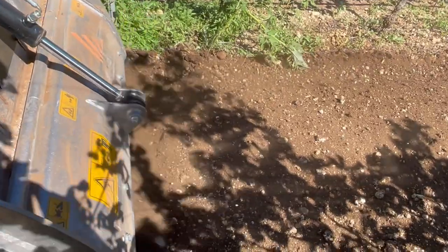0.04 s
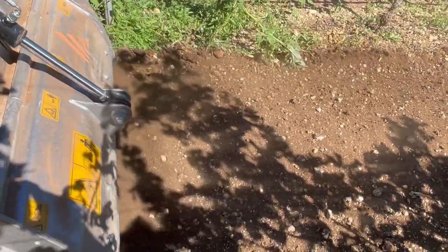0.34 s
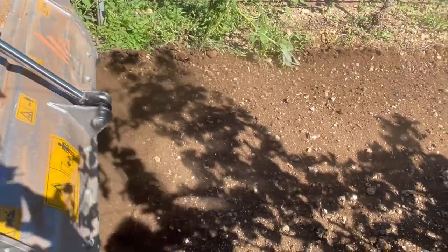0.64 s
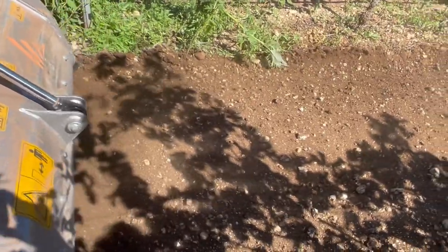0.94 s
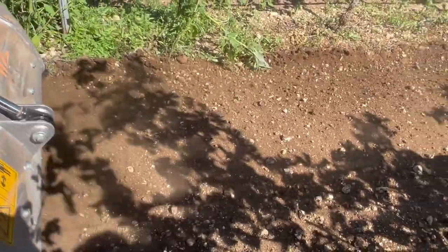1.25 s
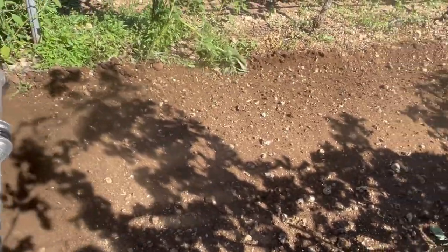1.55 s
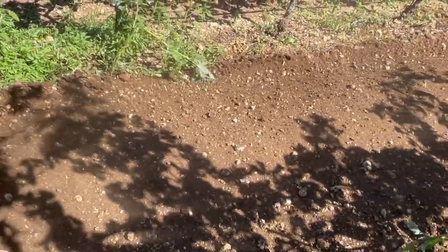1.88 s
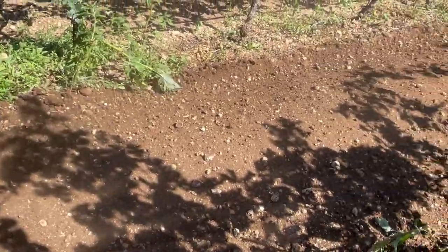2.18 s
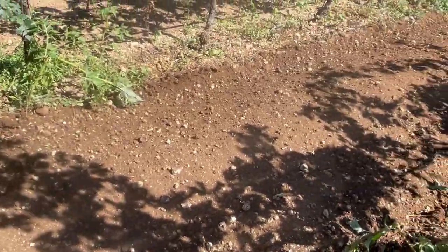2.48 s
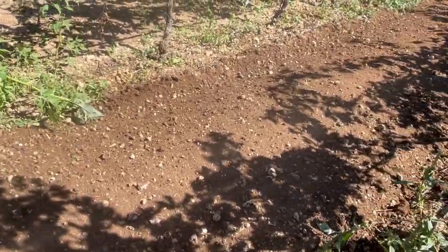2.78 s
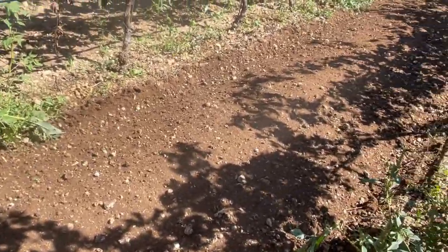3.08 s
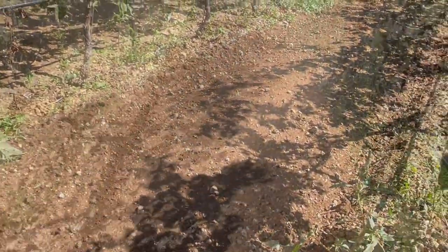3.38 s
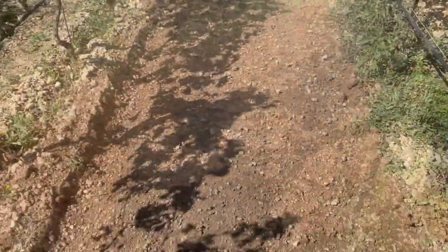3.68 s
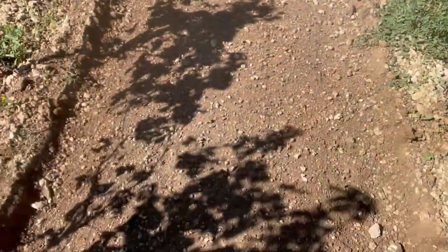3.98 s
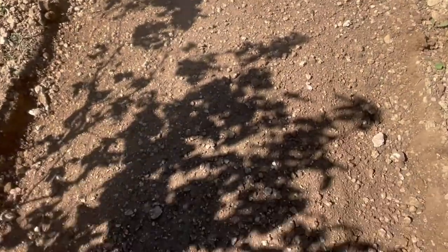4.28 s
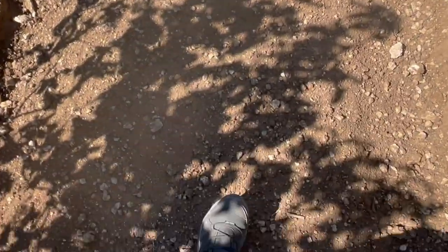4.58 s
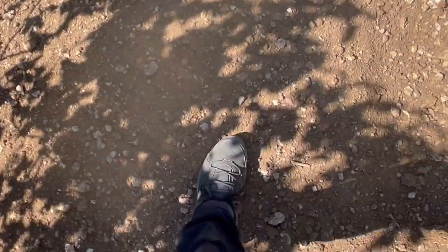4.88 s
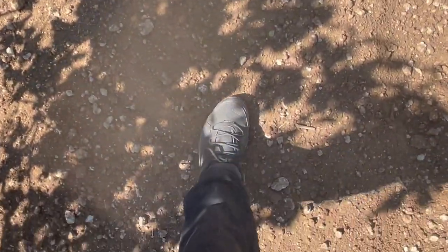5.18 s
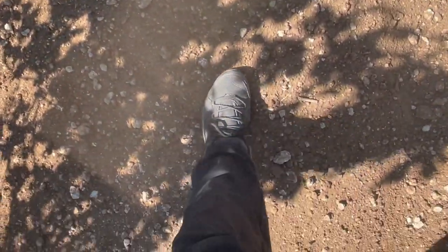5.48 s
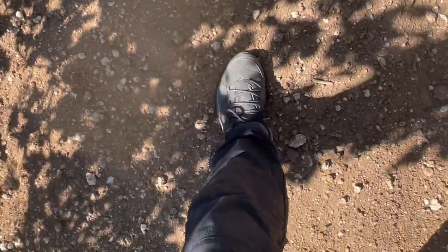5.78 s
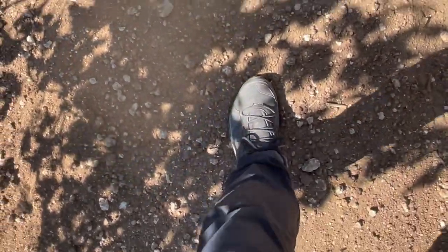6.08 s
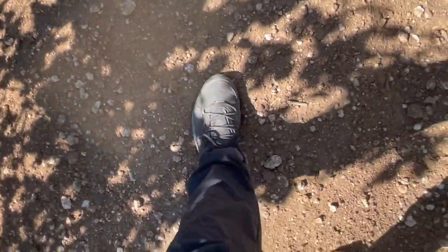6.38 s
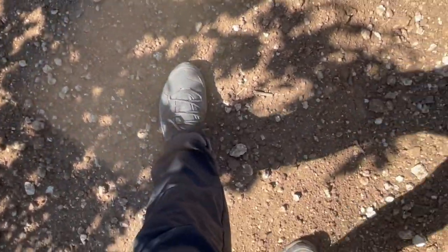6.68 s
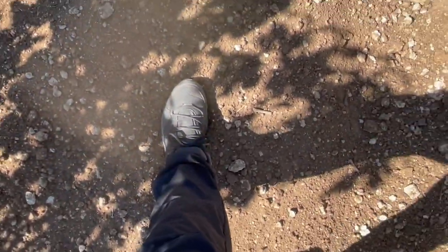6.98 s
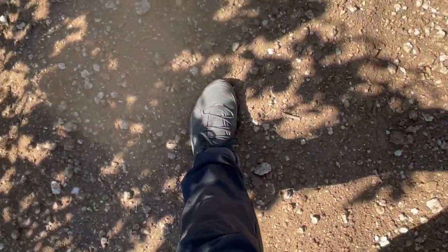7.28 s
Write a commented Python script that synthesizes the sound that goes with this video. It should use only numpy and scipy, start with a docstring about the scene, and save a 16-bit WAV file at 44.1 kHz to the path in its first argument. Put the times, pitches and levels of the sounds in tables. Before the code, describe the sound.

Outdoors on a dirt track, a nearby stone crusher grinds without pause behind a droning diesel tractor. Rocks tumble in the drum, rattle against the metal hood and spray out as grit, with brief swells and scattered hard cracks. The machine is first heard from the side, leaning left, then midway from the front, where the noise has a hollow, slowly shifting colour and the knocks eventually thin out.

```python
"""Stone crusher on a dirt track

A tractor tows a crusher: diesel and rotor hum, the drum rumbles, stones shatter on the steel hood and grit
sprays out, swelling with heaps and dipping in a gap in the feed. Impacts excite exponentially decaying
modes. The machine passes close on the left; from 3.5 s it is heard from the front, and interference with
the ground echo gives a hollow colour that shifts as the microphone sinks."""
import sys
import numpy as np
from scipy import signal
from scipy.fft import rfft, irfft, next_fast_len
from scipy.io import wavfile

SR = 44100
rng = np.random.default_rng(int(sys.argv[2]) if len(sys.argv) > 2 else 0)


def store_wav(level_fs):
    """Save 16-bit WAV to argv[1]."""
    pcm = np.round(np.clip(np.atleast_2d(level_fs), -1, 1) * 32767)
    wavfile.write(sys.argv[1], SR, pcm.T.astype(np.int16))


N = 328545
T = np.arange(N) / SR
FFT_SIZE = next_fast_len(N + 4096)
HZ = np.maximum(np.arange(FFT_SIZE // 2 + 1) * SR / FFT_SIZE, 1)
FIRING_HZ, ROTOR_HZ = 61.53, 26.1

# Crushing at even feed. Each row: time in seconds, then hood clatter, stone rattle and grit spray in dB.
CRUSH_LEVELS = [(0, -26.5, -30.5, -37.5), (.8, -25, -31.5, -37.5), (1.2, -25.5, -31, -37),
                (1.7, -25, -29.5, -35), (2.55, -28, -30, -39.5), (3.7, -24.5, -28, -35),
                (4.7, -27, -31.5, -40), (6.5, -25.5, -31.5, -40.5), (6.95, -26.5, -30.5, -38),
                (7.45, -26.5, -31, -34)]


def from_db(db):
    """Amplitude grows tenfold every 20 dB."""
    return 10 ** (np.asarray(db) / 20)


def unit_power(x):
    """Division by the RMS value gives unit power."""
    return x / np.sqrt(np.mean(x ** 2) + 1e-20)


def in_time(rows):
    """Linear interpolation of each column over time."""
    times, *columns = np.transpose(rows)
    return [np.interp(T, times, column) for column in columns]


def in_hz(points):
    """Interpolation over log frequency."""
    hz, value = np.transpose(points)
    return np.interp(np.log(HZ), np.log(hz), value)


def filtered(x, response):
    """A linear filter multiplies the spectrum by its response."""
    return irfft(rfft(x, FFT_SIZE) * response, FFT_SIZE)[..., :N]


def coloured(x, spectrum):
    """Spectral shaping, scaled to unit power."""
    return unit_power(filtered(x, from_db(in_hz(spectrum))))


def drift(rate_hz):
    """Low-passed noise: a smooth random fluctuation of unit power."""
    pole = np.exp(-80 * np.pi * rate_hz / SR)
    slow = signal.lfilter([1], [1, -2 * pole, pole * pole], rng.standard_normal(N // 40 + 2002))[2000:]
    return np.interp(np.arange(N) / 40, np.arange(len(slow)), unit_power(slow))


def decay(start_s, db, t60):
    """Exponential damping: a sudden start, then a fall of 60 dB in t60 seconds."""
    out, start = np.zeros(N), int(start_s * SR)
    age = T[:min(N - start, SR // 4)]
    out[start:start + len(age)] = from_db(db - 60 * age / t60)
    return out


def ring(clicks, hz, t60):
    """A damped resonator answers a unit impulse with a decaying sine of height 1."""
    r, w = from_db(-60 / (t60 * SR)), 2 * np.pi * hz / SR
    return signal.lfilter([0, np.sin(w)], [1, -2 * r * np.cos(w), r * r], clicks + 1e-18)


def tone(turns, unsteady):
    """Random modulation sways the level and phase of a sinusoid of unit power."""
    angle = 2 * np.pi * (turns + rng.random())
    in_phase = (1 + unsteady * drift(7.5)) * np.cos(angle)
    quadrature = unsteady * drift(6.9) * np.sin(angle)
    return (in_phase + quadrature) / np.sqrt(.5 + unsteady ** 2)


def strays(per_s, range_db=6):
    """Events at random gaps. Each row: start in seconds, dB below the strongest, pitch from -1 to 1."""
    gaps, weakness, pitch = rng.random((64, 3)).T
    starts = np.cumsum(.5 + gaps) / per_s
    return np.column_stack([starts, range_db * weakness, 2 * pitch - 1])[starts < T[-1]]


def impacts(per_s, spread_db, t60, rotor_db, surge_db, stones, stay_s=.12):
    """Shot noise on two paths: random blows, modulated at the rotor rate, ring a few passing stones."""
    modulation = from_db(rotor_db * np.cos(2 * np.pi * ROTOR_HZ * T + drift(15)) + surge_db * drift(24))
    sizes = modulation * from_db(spread_db * np.minimum(rng.exponential(1, N), 4))
    sizes *= rng.choice([-1, 1], N)
    rings = rng.standard_normal((512, 2, 2048)) * decay(0, 0, t60)[:2048]  # each stone's dense modes
    struck = (stones * (T / stay_s + rng.random(N))).astype(int) % len(rings)
    out = np.zeros((2, N + SR))
    for i in np.flatnonzero(rng.random(N) < per_s / SR):
        out[:, i:i + rings.shape[-1]] += sizes[i] * rings[struck[i]]
    return out[:, :N]


def load(onset_s=0.029, recovery_s=0.055):
    """Amplitude modulation by the load, in dB: the crushing swells with a heap and dips in a gap."""
    # Heaps and gaps in the feed. Each row: start in seconds, length in seconds, change of load in dB.
    feed = [(0.0, 0.063, 3), (0.915, 0.095, 5), (1.143, 0.027, -5), (1.25, 0.092, 1.5), (1.898, 0.11, 3),
            (2.166, 0.12, 2), (2.885, 0.11, 2), (3.24, 0.055, 0), (3.364, 0.063, 2), (3.887, 0.11, 2),
            (4.2, 0.11, 0), (5.193, 0.098, 2.5), (6.14, 0.26, 1.5), (6.778, 0.31, 1.5), (7.268, 0.04, 1)]
    return sum(db * np.interp(T, [s - onset_s, s, s + length, s + length + recovery_s], [0, 1, 1, 0])
               for s, length, db in feed)


def drive(load_db, wander=0.0012, whine_db=-12, teeth_rows=4):
    """Periodic forcing: diesel firing, gear whine and rotor teeth all follow one governed speed."""
    # Each row: multiple of the firing rate, dB from the side, dB from the front, unsteadiness from 0 to 1.
    partials = [(0.994, -31.5, -26, 0.077), (1.982, -33.5, -28, 0.24), (2.136, -40, -35.5, 0.3),
                (5.59, -64, -42, 0.25), (6.45, -44, -43, 0.3), (13.94, -43.5, -45.5, .39),
                (18.3, -47, -44, 0.44), (20.1, -39.5, -41, 0.21)]
    # The drone, and the teeth biting the soil. Each row: time in seconds, base level in dB.
    drone_levels = [(0, -30), (1.35, -32.5), (1.75, -33.5), (2.2, -32), (3.45, -41.5), (3.7, -26.5),
                    (4.7, -28), (5.7, -27), (7.45, -26)]
    bite_levels = [(0, -28), (1.1, -35), (1.6, -34), (2.05, -26), (2.6, -34.5), (3.2, -25.5), (3.7, -34.5),
                   (7.45, -32.5)]
    clock = np.cumsum(1 + wander * drift(1.57)) / SR
    beside = sum(viewpoints()[:2])
    engine = np.zeros(N)
    for multiple, side_db, front_db, unsteady in partials:
        level_db = beside * side_db + (1 - beside) * front_db
        engine += from_db(level_db) * tone(multiple * FIRING_HZ * clock, unsteady)
    drone_turns = 4 * FIRING_HZ * clock
    drone = tone(drone_turns, unsteady=.06) + from_db(whine_db) * tone(3 * drone_turns, unsteady=.15)
    teeth = tone(teeth_rows * ROTOR_HZ * clock, unsteady=0.43)
    bite_db = in_time(bite_levels)[0] + .8 * load_db
    return engine + drone * from_db(in_time(drone_levels)[0]) + teeth * from_db(bite_db)


def drum(load_db, rumble_db=-24.5, off_pitch_db_per_octave=12.5):
    """Resonance: soil and stones tumble, and heavy lumps excite most the drum modes near their pitch."""
    # The rumble. Each row: frequency in Hz, relative level in dB.
    spectrum = [(20, -46), (42, -30), (62, -11.5), (85, 0), (105, -1), (150, -9.5), (190, -4.5), (290, -7),
                (340, -15), (450, -29), (900, -48.5)]
    # Heavy lumps. Each row: start in seconds, level in dB, pitch in Hz.
    lumps = [(0.471, -14, 137), (0.929, -18, 207), (.946, -19, 200), (0.976, -13, 190), (0.991, -10, 105),
             (1.311, -10, 170), (1.406, -14.5, 186), (2.182, -23, 100), (2.283, -22, 170),
             (2.929, -12.5, 170), (3.004, -16, 191), (3.366, -15, 96), (3.439, -16, 195), (3.969, -13, 96),
             (5.17, -21, 190), (5.309, -14, 110), (6.349, -19, 320)]
    # Drum modes. Each row: frequency in Hz, gain in dB, t60 in seconds.
    modes = [(97, 2.5, 0.091), (121, -10, 0.073), (167, 0.5, 0.078), (193, -7, 0.11), (333, 4.5, 0.061)]
    tumble = impacts(per_s=900, spread_db=2.0, t60=0.047, rotor_db=1.0, surge_db=0.34, stones=16)
    rumble = coloured(tumble, spectrum) * from_db(rumble_db + load_db)
    starts, lump_db, lump_hz = np.transpose(lumps)
    for hz, mode_db, t60 in modes:
        mismatch_db = off_pitch_db_per_octave * abs(np.log2(hz / lump_hz))
        blows = np.zeros(N)
        blows[(starts * SR).astype(int)] = from_db(lump_db + mode_db - mismatch_db)
        rumble[0] += ring(blows, hz, t60)
    return rumble


def crushing(load_db):
    """Dense impacts merge into noise: stones hit the hood, crack on each other and spray out as grit."""
    # Spectra of the three layers. Each row: frequency in Hz, relative level in dB.
    hood_spectrum = [(200, -5.5), (300, -7), (385, 1.5), (470, -4.5), (660, 0), (780, -2), (900, -4),
                     (1250, -1.5), (1650, -3.5), (2100, -20), (4000, -34.5)]
    rattle_spectrum = [(900, -49), (1500, -1.5), (1850, 3), (2100, 2.5), (2400, 2), (2750, 0), (3200, -2),
                       (3700, -4.5), (4300, -5.5), (5100, -9.5), (6000, -14.5), (9000, -40)]
    grit_spectrum = [(3000, -23), (5000, 6.5), (5800, 2), (7300, 1), (9500, -1), (11500, -8.5),
                     (13600, -23), (16000, -2)]
    hood_db, rattle_db, grit_db = in_time(CRUSH_LEVELS)
    hood = impacts(per_s=2000, spread_db=1.0, t60=0.046, rotor_db=-0.2, surge_db=0.6, stones=10)
    rattle = impacts(per_s=2200, spread_db=1.5, t60=0.042, rotor_db=1.07, surge_db=0.77, stones=8)
    grit = impacts(per_s=1300, spread_db=2.0, t60=0.021, rotor_db=1.0, surge_db=1.5, stones=6)
    return (coloured(hood, hood_spectrum) * from_db(hood_db + 0.43 * load_db)
            + coloured(rattle, rattle_spectrum) * from_db(rattle_db + 0.34 * load_db)
            + coloured(grit, grit_spectrum) * from_db(grit_db + 0.12 * load_db))


def chips(over_grit_db=7, pure_t60=0.032, snap_t60=0.0015, snap_low_hz=3000):
    """Free vibration: a pebble snaps and rings at a pitch set by its size, purer the longer it lasts."""
    # Each row: start in seconds, level in dB, pitch in Hz, t60 in seconds, snap in dB relative to the ring.
    pebbles = [(.029, -15.5, 5400, .0087, -9), (.055, -19, 4500, .01, -9), (.37, -14.5, 4400, 0.01, -9),
               (.447, -16, 3300, 0.018, -6), (.461, -20, 12000, .0097, -2), (.519, -28, 9000, .009, -3),
               (.627, -22.5, 6000, .012, -7), (.826, -20, 6200, .007, -5), (1.122, -19, 6000, .0068, -4),
               (1.531, -11.5, 5600, .0084, -11), (1.659, -28, 13000, .0089, -4),
               (1.772, -26, 8500, .008, -5), (1.871, -29, 10000, .008, -5), (1.89, -19, 7600, .008, -5),
               (2.062, -26, 6000, .008, -1), (2.12, -19.5, 8950, 0.0071, -2), (2.23, -21, 5000, 0.012, -7),
               (2.489, -21, 4200, 0.012, -8), (2.949, -30, 12000, 0.0072, -3),
               (2.991, -21, 3800, 0.018, -12), (3.12, -24, 5800, .009, -10), (3.474, -22, 6540, .01, 1),
               (3.927, -22, 7960, 0.015, -11), (4.301, -25, 8000, .009, -5), (4.421, -27, 7000, .009, -10),
               (6.197, -25, 5200, .013, -9), (6.411, -28, 5300, .013, -12), (6.763, -23, 4400, 0.015, -9),
               (6.838, -13, 3690, 0.029, -9), (7.11, -19, 6700, .0083, -5)]
    crack = rng.standard_normal((2, N))
    high_pass = signal.butter(2, snap_low_hz, "high", fs=SR, output="sos")
    snap = signal.sosfilt(high_pass, rng.choice([-1., 1.], (2, N)))
    grit_db = in_time(CRUSH_LEVELS)[2]
    lesser = [(s, grit_db[int(s * SR)] + over_grit_db - weaker, 7500 * 2 ** (0.7 * pitch), 0.008, -10)
              for s, weaker, pitch in strays(per_s=5)]
    out = np.zeros((2, N))
    for s, db, hz, t60, snap_db in pebbles + lesser:
        span = slice(int(s * SR), int(s * SR) + SR // 10)
        purity = np.clip(2 * t60 / pure_t60 - 1, 0, 1)
        rough = unit_power(signal.lfilter(*signal.iirpeak(hz, Q=2.8, fs=SR), crack[:, span]))
        note = np.sin(2 * np.pi * hz * (T[span] - s))
        body = np.sqrt(1 - purity) * rough + np.sqrt(2 * purity) * note
        out[:, span] += body * decay(s, db, t60)[span]
        out[:, span] += snap[:, span] * decay(s, db + snap_db, snap_t60)[span]
    return out


def knocks(panel_gain=1.4, burst_s=0.00052):
    """Broadband excitation: a big stone bursts on the soil-damped hood, and the struck panel resonates."""
    # Each row: start in seconds, level in dB, t60 in seconds, pitch of the panel in Hz.
    big_stones = [(0.331, -20, 0.074, 2320), (0.927, -20, .16, 1300), (.962, -25, .2, 700),
                  (1.244, -19, 0.087, 750), (1.311, -21, 0.099, 1200), (1.81, -19, 0.025, 1200),
                  (1.954, -21, 0.12, 2300), (2.427, -18.5, 0.064, 2480), (2.586, -23.5, 0.11, 2260),
                  (2.893, -20, 0.045, 750), (3.083, -20, 0.076, 724), (3.366, -9.5, 0.11, 1210),
                  (3.432, -20, 0.16, 2350), (3.525, -23, 0.15, 2780), (3.862, -19, 0.089, 1170),
                  (3.898, -16.5, 0.15, 1180), (3.925, -15, 0.12, 1130), (4.041, -21, 0.063, 2660),
                  (4.281, -27, 0.1, 1220), (5.831, -26.5, 0.17, 5100), (6.139, -23, 0.15, 2600),
                  (7.005, -20, 0.12, 2070), (7.332, -17.5, 0.046, 2530)]
    # The crash. Each row: frequency in Hz, relative level in dB.
    spectrum = [(150, -10), (400, -3), (1100, 10), (2200, 6.5), (3500, -0.5), (5500, -1.5), (8000, -26),
                (15000, -50)]
    crash = coloured(rng.standard_normal((2, N)), spectrum)
    lesser = [(s, -32 - weaker, 0.051, 2000 * 2 ** (pitch / 2)) for s, weaker, pitch in strays(per_s=1.3)]
    out = np.zeros((2, N))
    for s, db, t60, hz in big_stones + lesser:
        span = slice(int(s * SR), int(s * SR) + SR // 4)
        panel = signal.lfilter(*signal.iirpeak(hz, Q=4.9, fs=SR), crash[:, span])
        envelope = decay(s, db, t60)[span] * np.clip((T[span] - s) / burst_s, 0, 1)
        out[:, span] += unit_power(crash[:, span] + panel_gain * panel) * envelope
    return out


def delayed(paths, ms):
    """Propagation delay, steady or moving."""
    return np.array([np.interp(T - ms / 1000, T, path) for path in paths])


def over_ground(x, dull_hz=4300, near_from_s=6.48, near_to_s=7.12, near_fade_s=0.17):
    """Comb filtering: dull echoes off the track and, briefly, a nearby surface interfere with the sound."""
    # The echo follows microphone height. Each row: time in seconds, lag in ms, strength from 0 to 1.
    reflection = [(0, 1.54, 0.09), (1.3, 1.38, 0.07), (2.4, 1.33, 0.04), (3.46, 1.18, 0.17),
                  (3.54, 1.83, 0.28), (4.15, 1.93, 0.23), (4.3, 1.73, 0.3), (4.52, 1.39, 0.16),
                  (5, 1.3, .17), (5.3, 1.3, 0.42), (5.6, 1.26, 0.34), (5.97, 1.09, 0.33), (6.3, 1.31, 0.53),
                  (6.6, 1.11, 0.24), (6.85, 0.93, 0.3), (7.1, 1.11, 0.16), (7.45, 1.18, 0.26)]
    lag_ms, strength = in_time(reflection)
    near = 0.2 * np.clip(np.minimum(T - near_from_s, near_to_s - T) / near_fade_s, 0, 1)
    dull = filtered(x, 1 / (1 + (HZ / dull_hz) ** 4))
    return (x + strength * delayed(dull, lag_ms) + near * delayed(dull, ms=1.44)) / np.sqrt(1 + strength ** 2)


def at_ports(spectra, colour, coherence, balance, lead):
    """Stereo cues: direct and scattered sound reach two microphone ports, unequal in level and phase."""
    direct, scattered = spectra * from_db(in_hz(colour))
    alike, sign = np.clip(in_hz(coherence), 0, 1), np.array([[1], [-1]])
    ports = np.sqrt((1 + alike) / 2) * direct + sign * np.sqrt((1 - alike) / 2) * scattered
    gain = from_db(sign * in_hz(balance) / 2)
    gain /= np.sqrt(np.mean(gain ** 2, axis=0))
    return irfft(ports * gain * np.exp(.5j * sign * in_hz(lead)), FFT_SIZE)[:, :N]


def viewpoints(passed_s=1.516, turned_s=3.52, lowered_s=4.66):
    """Crossfade weights for close, side, front and low: the hood passes, the microphone turns and sinks."""
    passed = np.clip((T - passed_s) / 0.24 + .5, 0, 1)
    turned = np.clip((T - turned_s) / 0.0023 + .5, 0, 1)
    lowered = np.clip((T - lowered_s) / 0.68 + .5, 0, 1)
    return 1 - passed, passed * (1 - turned), turned * (1 - lowered), turned * lowered


def at_listener(paths):
    """Each listening position has its own transfer function to the left and right ports."""
    # Colour. Each row: frequency in Hz, gain in dB.
    close_colour = [(60, 0.5), (120, 0), (200, 1.5), (320, 0.5), (400, 5), (680, 2.5), (1000, 0),
                    (1300, -1.5), (1500, -2.5), (2050, 1.5), (2350, -2), (3000, 0), (3700, -1.5),
                    (5000, -3), (12000, -0.5)]
    side_colour = [(60, 1.5), (150, 0), (200, 1), (320, -2), (400, 3), (680, 3), (1000, 0.5), (1300, -1),
                   (1500, -1.5), (2100, 1), (2450, -0.5), (3100, -2.5), (5000, -2.5), (12000, 0)]
    front_colour = [(60, .5), (240, 0), (330, -5), (420, -7.5), (560, 1.5), (720, 0), (850, -4.5),
                    (1150, -0.5), (1500, -4.5), (1700, -2.5), (1830, -7.5), (1950, -1.5), (2080, 1),
                    (2200, -7), (2320, -1), (2680, 2.5), (3300, -2.5), (3700, -2), (6000, 0)]
    low_colour = [(60, 1), (240, -0.5), (345, 4.5), (430, -3.5), (505, -11), (600, -5), (760, 0.5),
                  (950, -3), (1150, 1), (1280, -0.5), (1365, -7.5), (1460, -.5), (1570, -2.5), (1700, 2),
                  (1830, -2.5), (2020, 2), (2280, -1.5), (2650, 3), (3300, -2), (4000, -2), (5500, 0),
                  (12000, -3)]
    # Likeness of the ports. Each row: frequency in Hz, coherence from 0 to 1.
    close_coherence = [(110, 1), (300, 1), (700, 0.79), (1250, 0.63), (1800, 0.081), (3000, 0.43),
                       (4400, 0.15), (5500, .1), (6400, .65), (7300, 1), (7900, 1)]
    side_coherence = [(110, 1), (300, 0.94), (600, 0.62), (2600, 0.6), (3700, 0.42), (5000, 0.65),
                      (5900, 0.2), (6500, 0.5), (7200, 1), (7900, 1)]
    front_coherence = [(110, 1), (700, .96), (2400, 0.84), (3500, 0.84), (7200, 0.79), (7900, 1)]
    low_coherence = [(110, 1), (1200, 0.87), (2600, 0.57), (3300, 0.58), (5000, 0.31), (5800, .3),
                     (6400, 0.33), (7200, 0.99), (7900, 1)]
    # Balance. Each row: frequency in Hz, left minus right level in dB.
    close_balance = [(60, 0), (250, 2), (480, 7.5), (900, 4.5), (1300, 4), (1600, 0), (2050, -1), (2800, 6),
                     (4000, 3), (5000, 6), (6200, -2), (12000, 0.5)]
    side_balance = [(60, 0), (250, 3.5), (420, 7), (700, 6.5), (1100, 1.5), (1400, -1.5), (1900, -2),
                    (2400, 0.5), (2900, 3), (3600, 2.5), (5100, 3), (6300, -1), (12000, 2)]
    front_balance = [(60, 1.3), (400, 0), (1300, 3), (1650, 5), (1900, -1), (2900, 1), (4000, 0.5),
                     (5500, 2), (6400, 4), (6900, 3), (8000, -1)]
    low_balance = [(60, 1.45), (600, -0.5), (1000, 2.5), (1450, -1), (2100, 0), (2600, 4.5), (3100, -0.5),
                   (4400, 3.5), (5800, 6.5), (7000, 1.5), (8000, 0)]
    # Phase. Each row: frequency in Hz, lead of the left port in radians.
    close_lead = [(60, .1), (300, .6), (700, 1.2), (1200, 1.1), (1650, 2.3), (2000, .8), (2500, 3),
                  (2900, 6.1), (4300, 6.6), (4900, 8.7), (5600, 6.3), (6500, 5.4), (8300, 3.14), (11500, 0),
                  (14600, -3)]
    side_lead = [(60, .1), (300, .7), (700, 1.7), (1150, 2.1), (1500, 3.3), (1900, 3.9), (2240, 5.3),
                 (2900, 6.7), (4100, 6.4), (5150, 7.9), (6200, 5.8), (8300, 3.14), (11500, 0), (14600, -3)]
    front_lead = [(60, 0), (900, 0), (1900, -.4), (2800, .3), (4000, .3), (5100, .8), (5700, .4),
                  (6500, -.7), (8300, -3.14), (11500, -6.28), (14600, -9.3)]
    spectra = rfft(paths, FFT_SIZE)
    close = at_ports(spectra, close_colour, close_coherence, close_balance, close_lead)
    side = at_ports(spectra, side_colour, side_coherence, side_balance, side_lead)
    front = at_ports(spectra, front_colour, front_coherence, front_balance, front_lead)
    low = at_ports(spectra, low_colour, low_coherence, low_balance, front_lead)
    return sum(share * heard for share, heard in zip(viewpoints(), (close, side, front, low)))


def scene():
    """Superposition: the sources add on a direct and a scattered path and are heard over the ground."""
    load_db = load()
    machine = drum(load_db) + crushing(load_db) + knocks() + chips()
    machine[0] += drive(load_db)  # direct path only
    return at_listener(over_ground(machine))


def record(dry, low_cut_hz=42, high_cut_hz=15800):
    """Band limiting: the microphone drops the deepest bass, and the top is cut steeply."""
    dry = signal.sosfilt(signal.butter(4, low_cut_hz, "high", fs=SR, output="sos"), dry)
    return signal.sosfilt(signal.ellip(10, .1, 80, high_cut_hz, fs=SR, output="sos"), dry)


dry = scene()
out = record(dry)
store_wav(out)
```